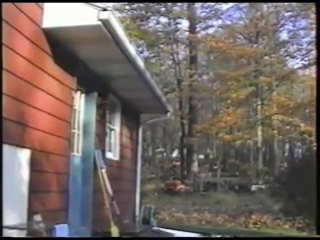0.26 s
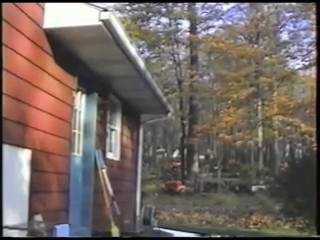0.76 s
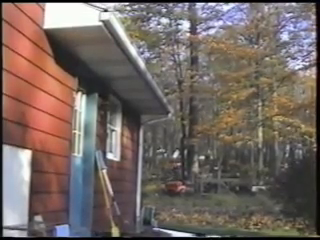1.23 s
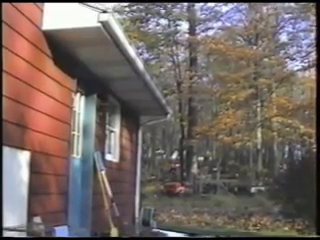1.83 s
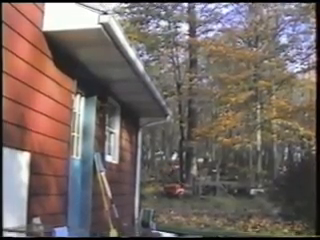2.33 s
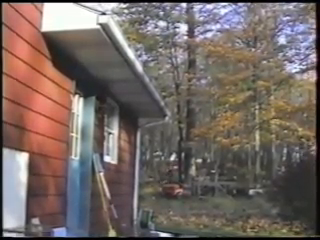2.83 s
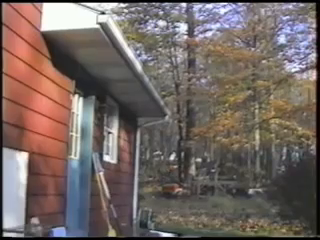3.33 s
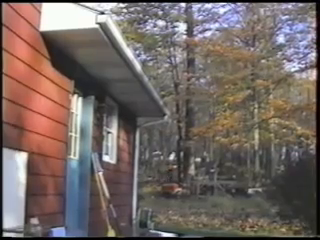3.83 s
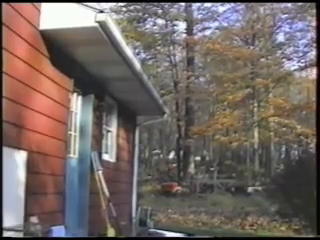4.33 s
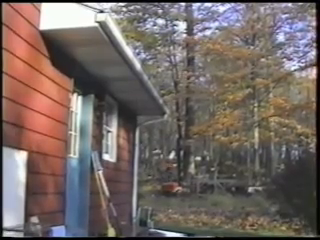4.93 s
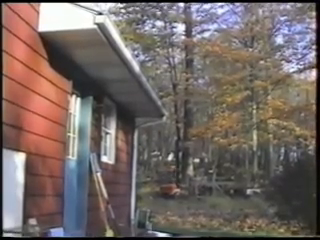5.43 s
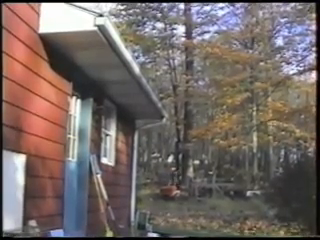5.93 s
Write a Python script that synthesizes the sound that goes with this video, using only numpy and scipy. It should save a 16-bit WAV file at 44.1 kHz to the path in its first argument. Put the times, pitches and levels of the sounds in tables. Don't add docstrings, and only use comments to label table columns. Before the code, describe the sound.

Outdoors by a house, sharp metallic knocks strike wood about once a second, each ringing briefly and scattering among trees under steady hiss.

```python
import sys
import numpy as np
from scipy import signal
from scipy.fft import rfft, irfft, next_fast_len
from scipy.io import wavfile
from scipy.ndimage import uniform_filter1d, map_coordinates

SR = 44100
rng = np.random.default_rng(int(sys.argv[2]) if len(sys.argv) > 2 else 0)


def inscribe(sig):
    pcm = np.round(np.clip(np.atleast_2d(sig).T, -1, 1) * 32767)
    wavfile.write(sys.argv[1], SR, pcm.astype(np.int16))


def gain_from_db(level_db):
    decades = np.asarray(level_db, float) / 20
    return 10 ** decades


N = 271656
LEAD_S = 0.004
USUAL_TAIL_DB = -16


def unit(x):
    return x / np.sqrt(np.mean(x ** 2) + 1e-20)


def along(points, hz):
    f, value = np.transpose(points)
    return np.interp(np.log(hz + 1), np.log(f + 1), value)


def filtered(x, response):
    size = next_fast_len(x.shape[-1] + 8192)
    hz = np.fft.rfftfreq(size, 1 / SR)
    return irfft(rfft(x, size) * response(hz), size)[..., :x.shape[-1]]


def resonances(modes):
    def response(hz):
        total = 0
        for k, (centre, width, db) in enumerate(modes):
            damping = 1j * hz * max(width, 45)
            sign = (-1) ** k
            total = total + sign * gain_from_db(db) * damping / (centre * centre - hz * hz + damping)
        return total
    return response


def wobble(rate):
    knots = rng.standard_normal(int(N * rate / SR) + 4)
    return map_coordinates(knots, [np.arange(N) * rate / SR])


def floor():
    # (f/Hz, level/dB per Hz)
    hiss_colour = [(40, 5), (120, -1.5), (450, -4.5), (1360, -10), (3300, -15), (4300, -12), (5500, -18),
                   (12000, -25)]
    # (f/Hz, rms level/dB)
    hum_lines = [(30, -94), (60, -62.5), (120, -72), (180, -70), (360, -81)]
    t = np.arange(N) / SR
    hiss = filtered(rng.standard_normal(N), lambda hz: gain_from_db(along(hiss_colour, hz)))
    hiss_level = gain_from_db(-60.5 + 0.6 * wobble(3.57))
    hum = np.zeros(N)
    for hz, db in hum_lines:
        level = gain_from_db(db - 2.0 + 1.8 * wobble(2.7))
        hum += level * np.sin(2 * np.pi * hz * t + 0.11 * wobble(6.0))
    return hiss_level * unit(hiss) + hum


def twigs():
    # (t/s, peak level/dB)
    rustles = [
        (0.5287, -46),
        (3.198, -49),
    ]
    out = np.zeros(N + SR)
    t = np.arange(SR // 10) / SR
    for s, db in rustles:
        fade = gain_from_db(db - 9 - 60 * t / 0.31)
        out[round(s * SR):][:len(t)] += fade * rng.standard_normal(len(t))
    return filtered(out[:N], resonances([(4000, 1700, 0)]))


def trees(colour):
    # (f/Hz, time to fall 60 dB/s)
    near_fade = [(150, 0.53), (500, 0.46), (1500, 0.22), (4000, 0.78), (10000, 0.33)]
    # (f/Hz, time to fall 60 dB/s)
    far_fade = [(150, 0.3), (500, 2.37), (1200, 1.9), (2500, 1.514), (5000, 1.1), (10000, 0.66)]
    # (f/Hz, level/dB per Hz)
    wash = [(90, -38), (150, -11.5), (300, -7.5), (1000, 4), (2500, -1.5), (5000, -10.5), (8000, -25.5),
            (12000, -73)]
    hz, t, noise = signal.stft(rng.standard_normal((2, 2 * SR)), SR, nperseg=256)
    near = noise[0] * gain_from_db(-60 * t / along(near_fade, hz)[:, None])
    far = noise[1] * gain_from_db(-60 * t / along(far_fade, hz)[:, None])
    clumps = uniform_filter1d(rng.standard_normal(near.shape), size=3, axis=1)
    clumps = uniform_filter1d(clumps, size=8, axis=0)
    tail = (near + gain_from_db(-9) * far) * gain_from_db(0.54 * unit(clumps))
    tail = signal.istft(tail, SR, nperseg=256)[1]
    tail = filtered(tail, lambda hz: np.abs(resonances(colour)(hz)) + gain_from_db(along(wash, hz)))
    tail *= 1 - np.exp(-(np.arange(len(tail)) / SR / 0.0021) ** 2)
    return tail / np.std(tail[:SR // 10])


def struck(head_db, wedge_db, tail_db, column):
    # (f/Hz, width/Hz, level in the blow/dB, level in the woods/dB)
    head = [(1925, 144, 3, 3), (2884, 122, 2.9, -3), (3630, 110, -2.5, -16), (4950, 230, -6.5, -19)]
    # (f/Hz, width/Hz, level in the blow/dB, level in the woods/dB)
    wedge = [(504, 64, -7.5, -6), (1017, 65, 4.3, -2), (1590, 130, -16, -12.5), (2038, 110, 0, -2.5),
             (2245, 79, 4, -2.5), (4090, 117, -21, -19.5)]
    # (f/Hz, width/Hz, level in the blow/dB, level in the woods/dB)
    timber = [(227, 120, -10, -13.5), (800, 75, -3.5, -2.5), (1188, 86, 3, 5.5), (2440, 420, -18.5, -14.5),
              (4530, 420, -17.5, -15)]
    # (f/Hz, width/Hz, level in the blow/dB, level in the woods/dB)
    split = [(1362, 128, -10, 4), (3310, 235, -26, -7), (5650, 590, -25, -20.5)]
    split_db = 1.37 * (tail_db - USUAL_TAIL_DB)
    modes = []
    for body, db in ((head, head_db), (wedge, wedge_db), (timber, 0), (split, split_db)):
        modes += [(row[0], row[1], row[column] + db) for row in body]
    return sorted(modes)


def blow(modes, crack_db, thump_db, contact_s):
    # (f/Hz, level/dB per Hz)
    crack_colour = [(300, -32), (1000, 0), (2500, 2.5), (4500, -6), (7300, -14.5), (10000, -30),
                    (12400, -30), (22000, -120)]
    # (f/Hz, level/dB, time to fall 60 dB/s)
    knock = [(108, 0.5, 0.063), (189, -4, 0.098), (246, -8.5, 0.15), (321.7, -10.5, 0.24),
             (489.6, 2.5, 0.15), (817, 6, 0.12)]
    t = np.arange(SR // 4) / SR
    click = 1. * (t == 0)
    ring = filtered(click, resonances(modes)) * (1 - np.exp(-t / max(contact_s, 1e-4)))
    fibres = unit(filtered(rng.standard_normal(len(t)), lambda hz: gain_from_db(along(crack_colour, hz))))
    crack = fibres * gain_from_db(-60 * t / 0.035) * (1 - np.exp(-t / 0.0006))
    thump = np.zeros(len(t))
    for hz, db, t60 in knock:
        thump += gain_from_db(db + rng.normal(0, 3.3) - 60 * t / t60) * np.sin(2 * np.pi * hz * t)
    thump *= 1 - np.exp(-t / 0.018)
    body = ring / np.abs(ring).max() + gain_from_db(crack_db) * crack + gain_from_db(thump_db) * thump
    ahead = t[:round(LEAD_S * SR)]
    early_hiss = gain_from_db(-38) * fibres[-len(ahead):] * np.sqrt(ahead / LEAD_S)
    return np.append(early_hiss, body)


def hammering():
    # (t/s, peak level/dB, tail level/dB re blow, tool head level/dB re timber, wedge level/dB re timber)
    blows = [
        (0.8187, -15.5, -24, 8, 7),
        (1.6573, -9.5, -25.5, -12.5, -11),
        (2.5394, -17.5, -14, -3.5, -8.5),
        (3.485, -13.5, -19.5, 4.5, 8),
        (4.5071, -17, -14.5, 5.5, 17),
    ]
    # (delay/s, level/dB)
    echoes = [
        (.014, -20),
        (.023, -20),
        (.035, -16),
        (.043, -18),
        (.055, -18),
        (.0645, -12),
    ]
    out = np.zeros(N + 3 * SR)
    for s, db, tail_db, head_db, wedge_db in blows:
        crack_db = -6.5 + 0.36 * wedge_db
        thump_db = tail_db - 3
        contact_s = 0.0007 * gain_from_db(0.4 * wedge_db)
        modes = struck(head_db, wedge_db, tail_db, column=2)
        direct = gain_from_db(db + 3.5) * blow(modes, crack_db, thump_db, contact_s)
        dull = filtered(direct, resonances([(1770, 1900, 0.0057)]))
        scattered = gain_from_db(db + tail_db) * trees(struck(head_db, wedge_db, tail_db, column=3))
        out[round((s - LEAD_S) * SR):][:len(direct)] += direct
        out[round(s * SR):][:len(scattered)] += scattered
        follow_db = 0.63 * (tail_db - USUAL_TAIL_DB)
        for delay, echo_db in echoes:
            level = gain_from_db(echo_db + follow_db + rng.normal(0, 1))
            out[round((s - LEAD_S + delay) * SR):][:len(dull)] += level * dull
    return out[:N]


def scene():
    return np.tile(hammering() + twigs() + floor(), (2, 1))


def band_limited(x):
    return filtered(x, lambda hz: 1 / (1 + (hz / 12050) ** 80))


def hushed(x):
    # (start t/s, end t/s, treble level/dB)
    hushes = [
        (.797, .8145, -20),
        (3.468, 3.481, -35),
        (4.489, 4.503, -35),
    ]
    t = np.arange(N) / SR
    treble = filtered(x, lambda hz: 1 / (1 + (450 / (hz + 1)) ** 6))
    for start, end, db in hushes:
        hush = uniform_filter1d(1. * ((t > start) & (t < end)), size=66)
        x = x - treble * (1 - gain_from_db(db)) * hush
    return x


def top_cut(x):
    return signal.sosfilt(signal.butter(12, 12540, fs=SR, output="sos"), x)


def record(dry):
    # (start t/s, end t/s)
    dropout = (6.0400, 6.0738)
    offset = (.0063, .0068)
    # (f/Hz, level/dB per Hz)
    track_noise = [(25, 24), (60, 4), (250, -19), (5000, -11), (9000, -1), (11500, 2.5), (12300, -1), (12700, -33)]
    t = np.arange(N) / SR
    x = dry[0] / (1 + np.abs(dry[0] / 0.235) ** 4) ** (1 / 4)
    x = hushed(x)
    smear = signal.fftconvolve(x, rng.standard_normal(SR // 200) * gain_from_db(-53.5))[:N]
    own_noise = unit(filtered(rng.standard_normal((2, N)), lambda hz: gain_from_db(along(track_noise, hz))))
    playing = uniform_filter1d(1. * ((t < dropout[0]) | (t > dropout[1])), size=9)
    gap_hiss = gain_from_db(-105) * band_limited(rng.standard_normal(N)) * (1 - playing)
    tracks = band_limited(x + smear * [[1], [-1]])
    tracks = (tracks + np.reshape(offset, (2, 1))) * playing
    return top_cut(tracks + gap_hiss + gain_from_db(-76.5) * own_noise)


dry = scene()
out = record(dry)
inscribe(out)
```